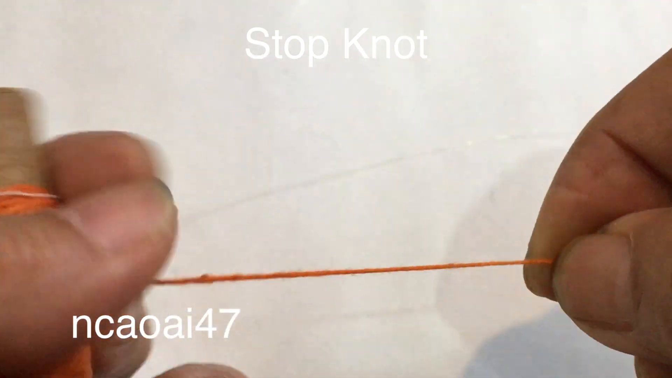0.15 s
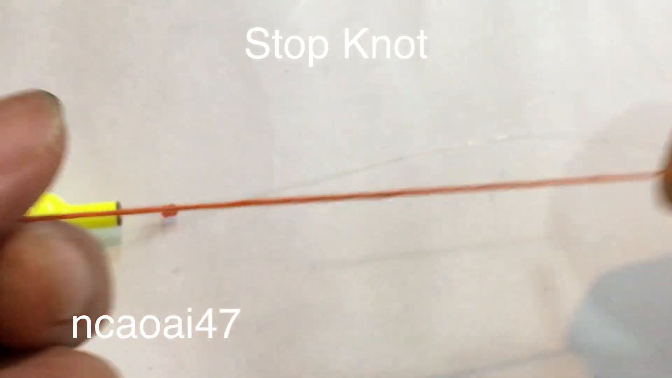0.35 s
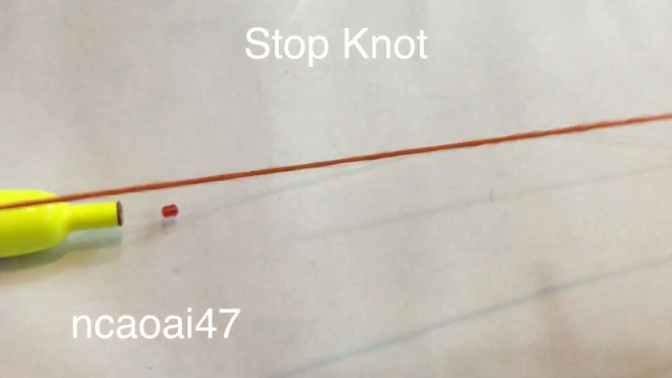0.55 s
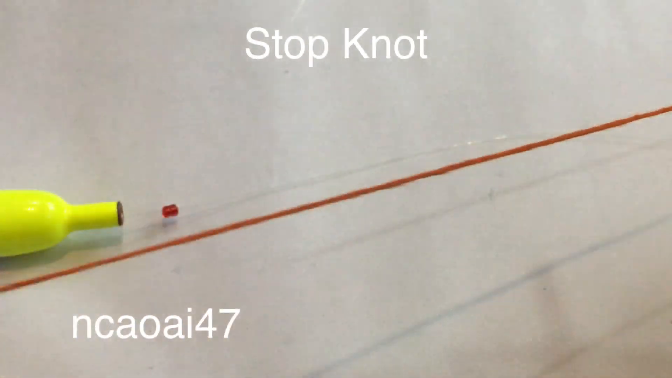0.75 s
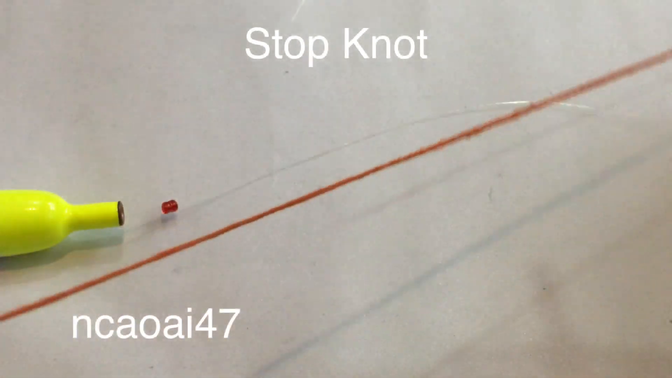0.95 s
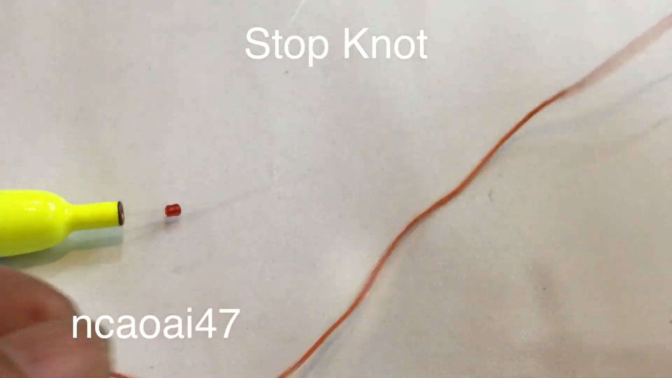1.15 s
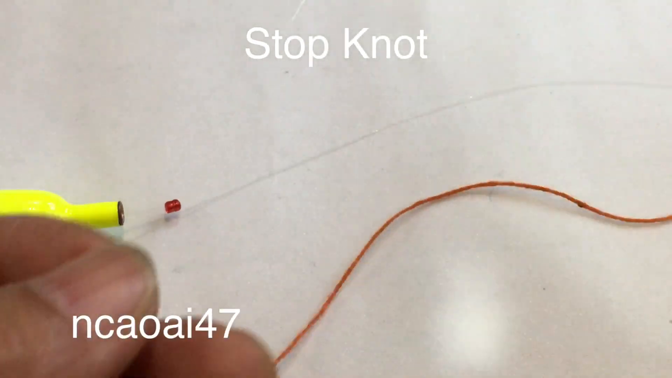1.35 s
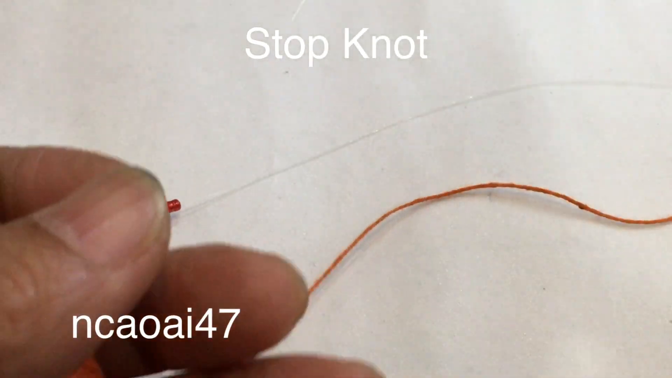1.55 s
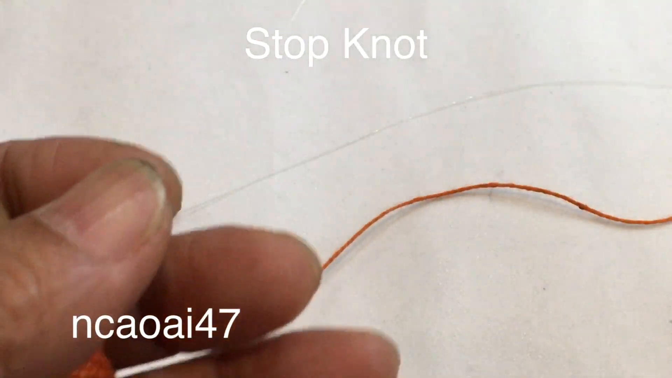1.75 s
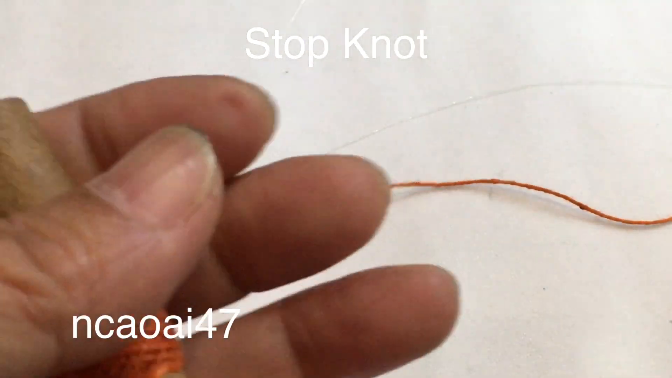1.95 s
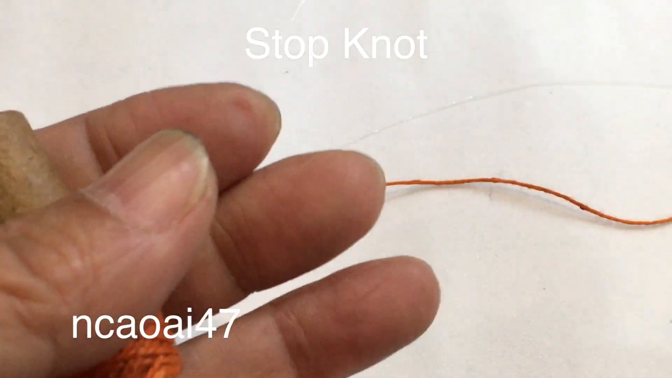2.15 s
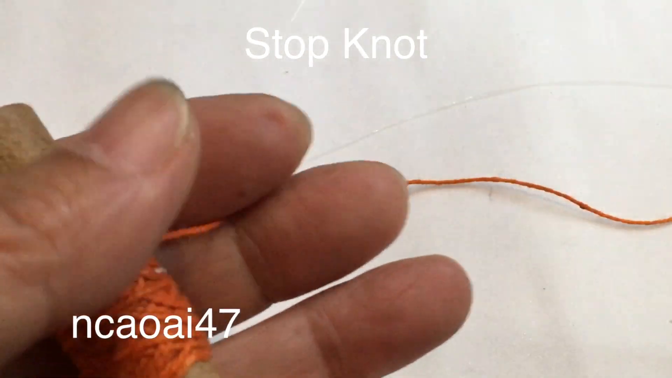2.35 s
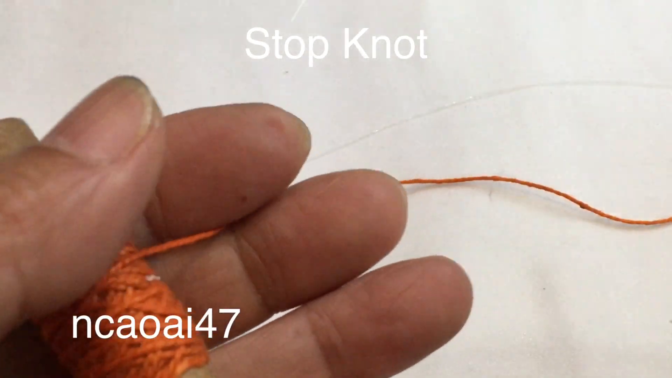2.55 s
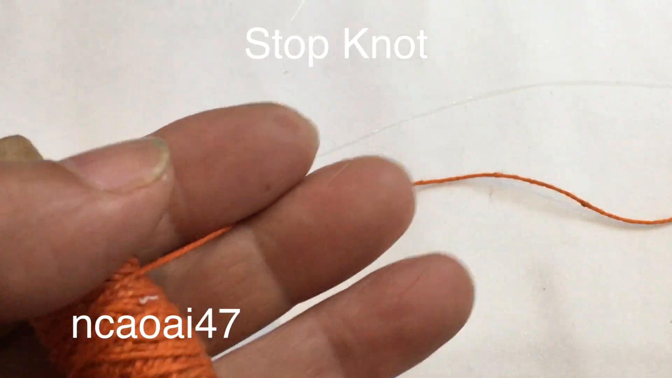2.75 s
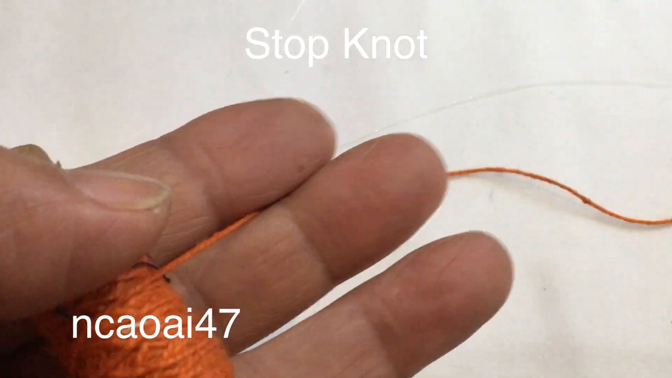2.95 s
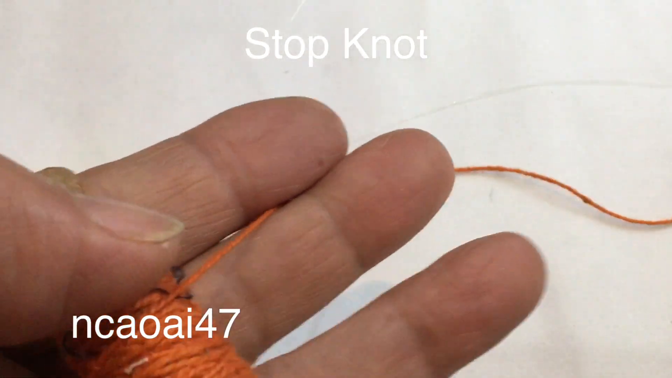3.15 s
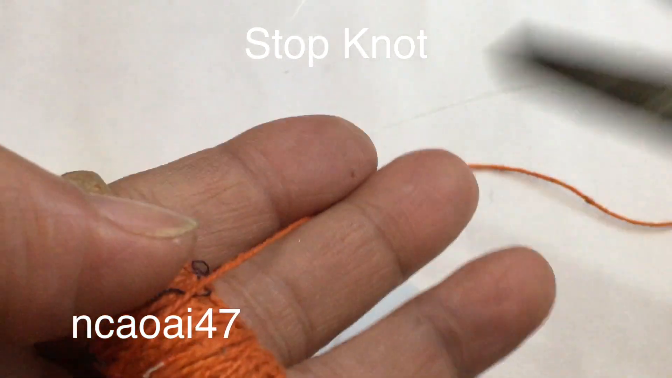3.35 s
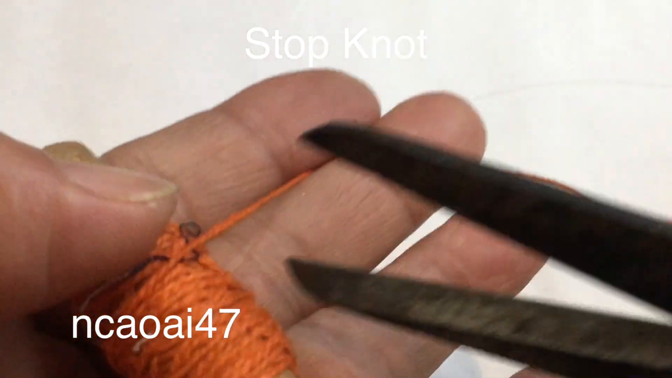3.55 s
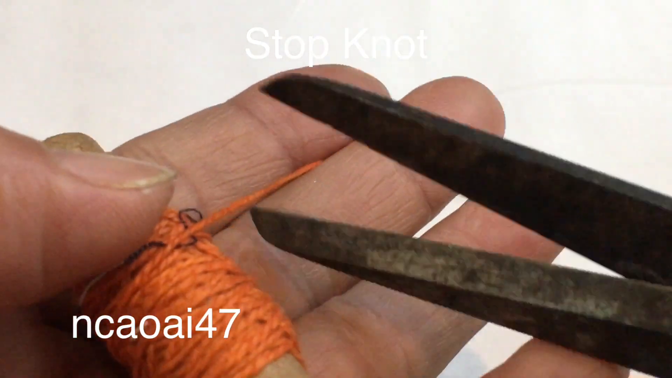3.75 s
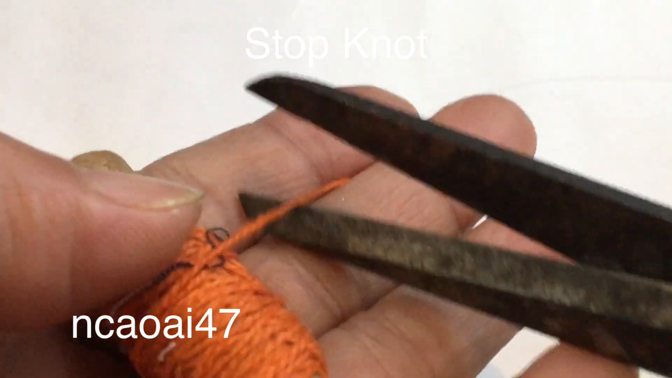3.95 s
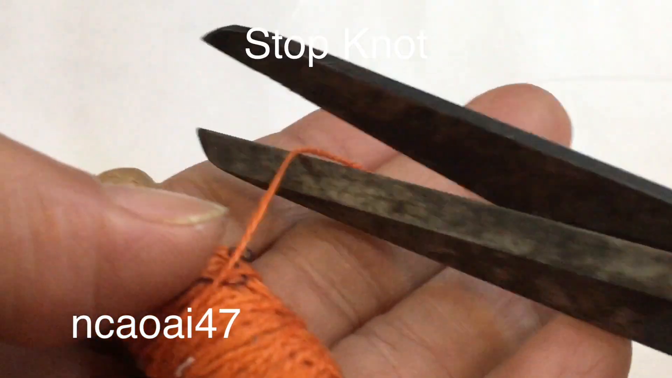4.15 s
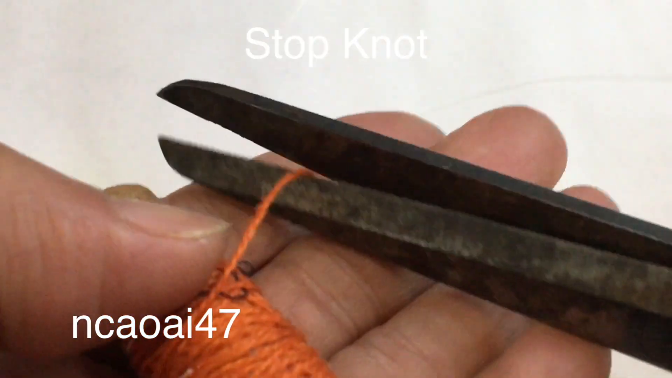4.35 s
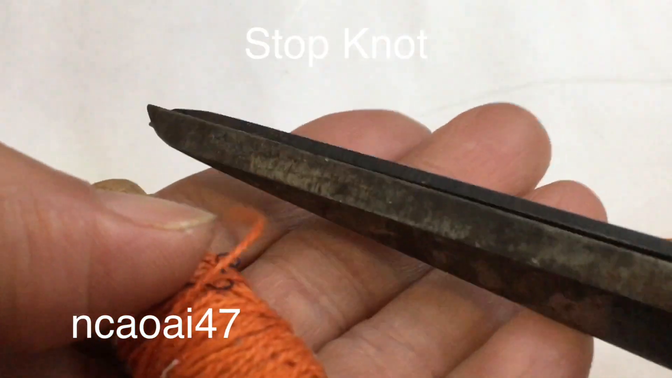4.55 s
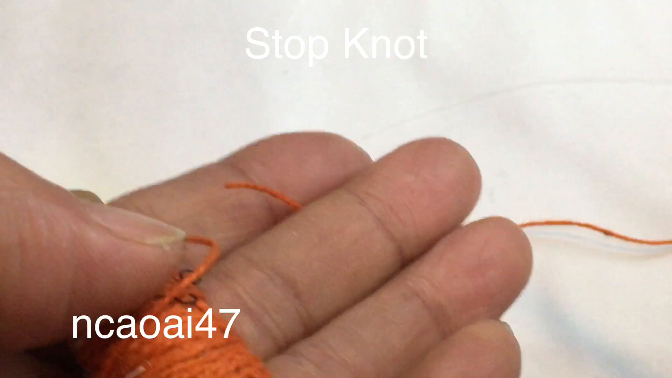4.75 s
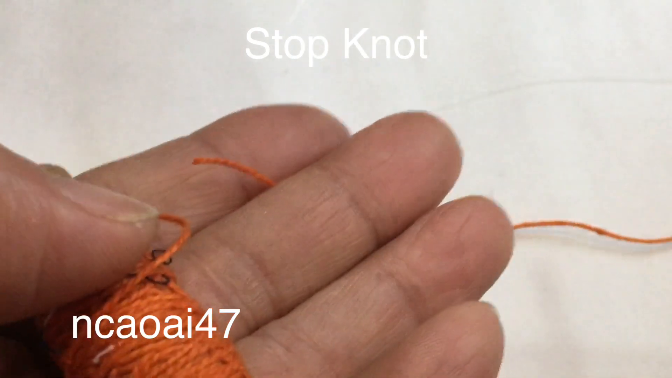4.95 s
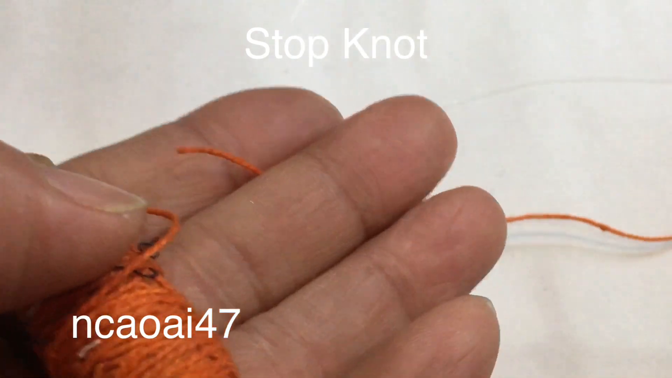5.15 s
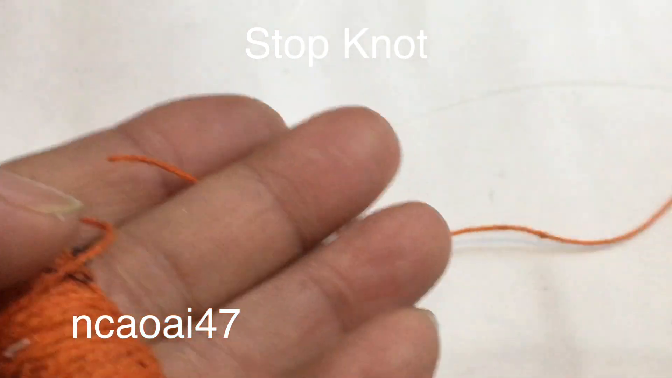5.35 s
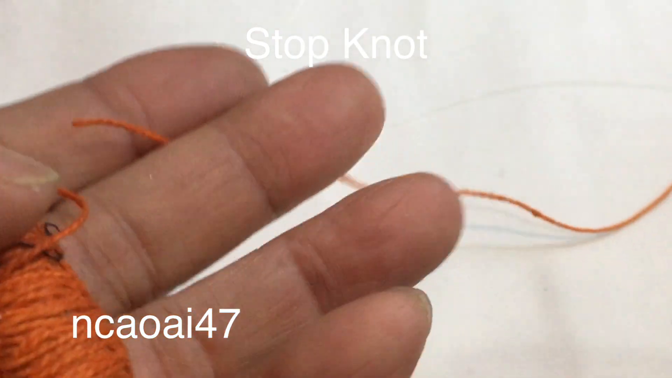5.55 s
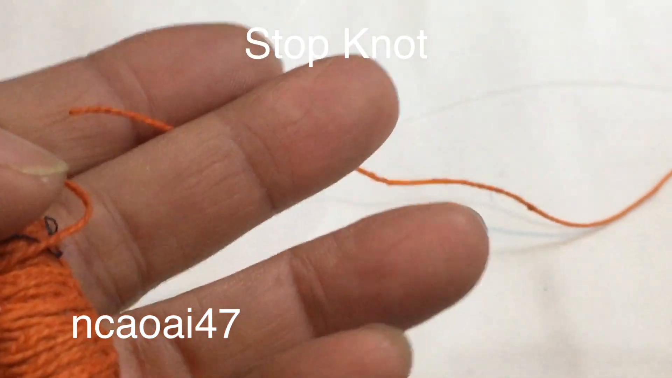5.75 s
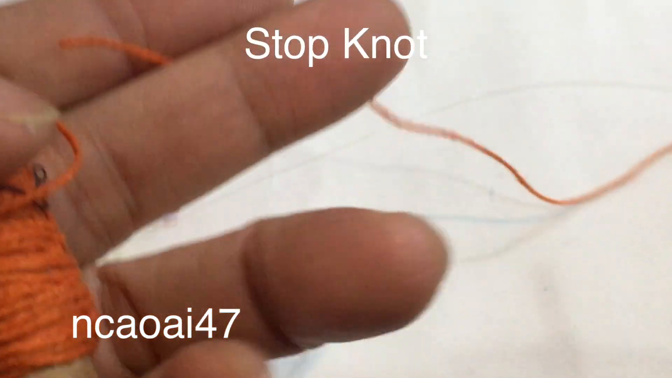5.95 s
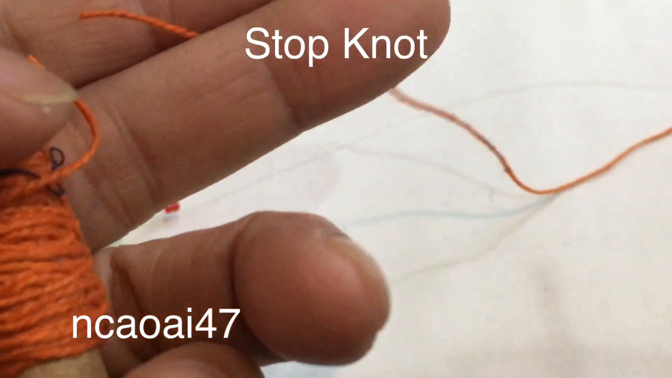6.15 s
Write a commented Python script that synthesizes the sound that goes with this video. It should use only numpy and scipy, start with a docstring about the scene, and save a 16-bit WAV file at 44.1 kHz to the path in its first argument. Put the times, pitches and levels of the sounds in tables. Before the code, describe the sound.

Close up, faint thread rustle and dull finger taps, crisp steel snip of big scissors, then four loud ringing knocks on a wooden table top.

```python
"""Thread hisses through fingers and sleeves swish, close up in a small quiet room: shaped friction noise.
Fingers tap and rub a wooden spool (filtered bursts, noise); fibres crackle (ticks); a low hum swells once.
Heavy steel scissors click open and slide shut through the thread: noise force on damped modes, friction.
Laid on the table they knock four times, chatter and ring out: modes of table top and steel.
"""
import sys
import numpy as np
from scipy import signal
from scipy.fft import rfft, irfft, next_fast_len
from scipy.io import wavfile
from scipy.ndimage import uniform_filter1d

SR = 44100
rng = np.random.default_rng(int(sys.argv[2]) if len(sys.argv) > 2 else 0)


def unload_wav(signal):
    """Save mono or channel-first audio to the path in sys.argv[1] as 16-bit WAV at rate SR, clipped to [-1, 1]."""
    wavfile.write(
        sys.argv[1],
        SR,
        np.round(np.clip(np.atleast_2d(signal).T, -1, 1) * 32767).astype(np.int16),
    )


N = 272934
TIME = np.arange(N) / SR
TAIL = TIME[:SR // 2]

# Event levels: energy spread over 10 ms. Movement levels: rms at the peak of the arch.
# Colours and mode levels are relative. Build-up and fade are exponential time constants.

# room air and rumble colour: f/Hz, level/dB
AIR_COLOUR = [(12, -42.5), (20, -38.5), (43, 2.5), (81, -7.5), (120, 1.5), (168, -9), (234, -8),
              (434, -19.5), (780, -22), (1120, -18), (3950, -37), (5680, -44), (7110, -43), (9670, -30.5),
              (16000, -42)]
# sleeves swish as the arms move: start/s, length/s, level/dB
SLEEVE_SWISHES = [(0, 0.4, -63.5), (.95, 0.51, -66.5), (1.45, 1.39, -67), (2.85, 0.4, -65.5),
                  (3.22, 0.4, -67), (3.58, 0.41, -62.5), (4.33, 0.31, -65.5), (4.54, 0.35, -58),
                  (4.76, 0.39, -65)]
# thread drawn over skin or blade: start/s, length/s, level/dB
THREAD_PULLS = [(-.06, .26, -71), (.2, 0.53, -60), (.32, 0.16, -71), (.58, 0.069, -61), (.705, 0.31, -60),
                (1.05, .3, -75), (1.51, 0.057, -73), (2.385, 0.12, -68.5), (2.82, 0.22, -74),
                (4.11, 0.07, -70.5)]
# thread friction colour: f/Hz, level/dB
THREAD_HISS_COLOUR = [(1470, -52.5), (2500, -11.5), (3550, -11.5), (3770, -7), (4800, -9.5), (5560, 3),
                      (6600, -3), (9290, -1), (10500, -5.5), (15000, -6), (16000, -21)]
# fibres catch and let go: t/s, level/dB, fade/s
FIBRE_SNAGS = [(0.6073, -50, 0.0012), (1.019, -64, 0.0017), (1.073, -70, 0.0027), (1.109, -68, 0.0027),
               (1.154, -66, 0.002), (1.254, -69.5, 0.0012), (1.319, -68, 0.0018), (1.333, -64, 0.0012),
               (1.933, -69.5, 0.00091), (2.021, -68.5, .001), (2.091, -59.5, 0.00068), (2.5225, -70, .0012)]
# taps of fingers and spool: t/s, level/dB, brightness (low-pass)/Hz, t60/s
SPOOL_TAPS = [(0.607, -68, 12000, 0.061), (2.058, -52.5, 2000, 0.037), (2.0759, -48.5, 1490, 0.031),
              (2.0906, -44, 6500, 0.0082), (2.0922, -46.5, 600, 0.039), (2.155, -50, 600, 0.016),
              (2.393, -52, 2000, 0.096), (2.4173, -42, 2100, 0.027), (2.502, -49.5, 2010, 0.049),
              (2.522, -52.5, 5850, 0.026), (3.518, -53.5, 543, 0.016), (4.481, -49.5, 5130, 0.043),
              (4.5008, -51, 4000, 0.023), (4.517, -48, 607, 0.031), (4.538, -52.5, 2000, 0.011)]
# tap colour: f/Hz, level/dB
TAP_COLOUR = [(40, 3.5), (130, -4), (280, 10), (650, -8.5), (1200, -1), (2500, -13.5), (6000, -14.5),
              (16000, -29.5)]
# fingers rub on the spool: start/s, length/s, level/dB
SPOOL_RUBS = [(2.025, 0.15, -62.5), (2.25, .125, -60.5), (2.49, 0.069, -62), (2.57, 0.044, -56.5),
              (2.92, 0.14, -67)]
# slack thread and dry fingers crackle: start/s, length/s, level/dB
FIBRE_CRINKLES = [(.96, 0.23, -69.5), (1.23, 0.16, -77), (2.06, 0.18, -70.5), (2.49, 0.11, -73.5)]
# steel modes: f/Hz, free t60/s, level blade on blade/dB, level shut scissors on table/dB
STEEL_MODES = [(1900, 0.09, -18.5, -12.5), (2420, .1, -13.5, -13.5), (3530, 0.12, -13.5, -21),
               (4506, 0.24, -9, -37), (5510, .2, -7, -19), (6135, 0.28, -15.5, -6.5),
               (7035, 0.28, -2.5, -4.5), (7720, .2, -3.5, -8.5), (8380, 0.13, -12, -7),
               (8640, 0.19, -25, 4.5), (8736, 0.18, -22, 4), (9140, .19, -6.5, -1.5),
               (9130, .14, -21.5, -8.5), (9760, 0.17, 3.5, -10), (9940, 0.26, -9, -2),
               (10020, .22, -26, -4), (10700, .15, -6, -4), (11320, .16, -5.5, -8.5),
               (11700, .14, -7.5, -8.5), (12450, 0.5, -16, -6), (13060, 0.13, -1.5, -18),
               (13100, .1, -21, -28), (14560, .26, -21.5, -7.5), (14560, .14, -5.5, -4)]
# blade against blade, in the hand: t/s, level/dB, build-up/s, fade/s, tilt/(dB/octave),
# most excited f/Hz, its lift/dB
BLADE_CLICKS = [(3.135, -32, 0.0015, 0.0019, 4, 9900, 2), (3.141, -45.5, 0.0013, 0.0064, 1.5, 5450, 17),
                (3.176, -59, 0.016, 0.019, -7.5, 7540, 8), (3.211, -57, .008, 0.015, -7.5, 11400, 23),
                (3.2291, -54, 0.000041, 0.001, 0.5, 11250, 5), (4.37, -51.5, 0.00055, 0.002, 3.5, 11130, 8),
                (4.532, -34, .0037, 0.0037, -1, 11500, 4.5), (4.559, -46, 0.0025, 0.0058, -2, 12500, 7.5),
                (4.571, -27, 0.00012, 0.00069, -1, 13500, 6), (4.764, -40, 0.0033, 0.0045, 1.5, 10330, 3),
                (4.838, -58, 0.0015, 0.0045, 4, 10000, 10), (4.8488, -37.5, 0.00026, 0.0035, 0, 6100, 15)]
# edges slide along each other: start/s, length/s, level at start/dB, level at end/dB
EDGE_STROKES = [(4.307, 0.22, -64.5, -65.5), (4.549, .425, -61.5, -64.5)]
# edge friction colour: f/Hz, level/dB
EDGE_COLOUR = [(500, -10), (1200, 5.5), (2300, -0.5), (4000, -2.5), (5200, -6.5), (7000, -6), (10000, -9),
               (16000, -14)]
# scissors are laid on the table top: t/s, level/dB, contact hardness (low-pass)/Hz
TABLE_KNOCKS = [(5.3761, -36.5, 5000), (5.38, -45.5, 4000), (5.4733, -29.5, 5100), (5.483, -39.5, 2980),
                (5.641, -25, 4860), (5.656, -39, 2520), (5.835, -49.5, 790), (5.861, -30, 1910),
                (5.8787, -22.5, 5800), (5.894, -27.5, 3450), (5.901, -31, 3470), (5.921, -34.5, 1970),
                (5.929, -31.5, 2000)]
# table top modes: f/Hz, t60/s, level/dB
TABLE_MODES = [(221, 0.12, -5.5), (290, 0.065, -1.5), (359.6, 0.067, -0.5), (541, 0.055, -2),
               (783, 0.062, -4), (923, 0.033, -1.5), (1300, 0.029, 5.5), (1398, 0.045, -6.5),
               (1706, 0.054, -19), (2114, 0.028, 1), (2534, 0.034, -1.5), (3110, 0.043, -5),
               (3630, 0.0088, -0.5)]
# table top dense-mode colour: f/Hz, level/dB
WOOD_COLOUR = [(80, -46), (250, -0.5), (600, -6.5), (1300, 3), (3000, 1), (6000, -4.5), (16000, -4)]
# loose blades rattle on the table: t/s, level/dB, build-up/s, fade/s, ring/dB, tilt/(dB/octave)
BLADE_CHATTER = [(5.38, -33.5, .0015, .004, -16, 16), (5.3907, -33.5, .0004, 0.0042, -5, 2),
                 (5.485, -38.5, .0087, 0.013, -22, -6), (5.6441, -26, .0014, 0.0028, -34, 6.5),
                 (5.655, -36, .0016, 0.0025, -24, 6), (5.864, -23.5, .0005, 0.011, -15, 2.5),
                 (5.881, -20.5, .0005, 0.012, -3, 0), (5.892, -25, .0015, 0.0044, 3, 10),
                 (5.9, -21, .0009, 0.0061, 4, -0.5), (5.931, -31.5, .0008, 0.0042, -14, 1)]
# room tail colour: f/Hz, level/dB
WALL_COLOUR = [(100, -7), (300, -8), (1000, -4.5), (2300, -5.5), (3600, -5.5), (5000, -1.5), (10000, -8),
               (16000, -6.5)]

# background rms; arm rumble is relative to its swish
RUMBLE_DB, AIR_DB, HISS_DB, ARM_RUMBLE_DB = -59, -69, -78.5, 3
HUM_HZ, HUM_DB, HUM_START_S, HUM_ATTACK_S, HUM_FADE_S = 162.4, -59, 1.15, 0.14, 1.0
# blades ring longer in a loose hand than in the firm grip taken for the cut
LOOSE_T60_S, FIRM_T60_S, GRIP_AT_S = 0.016, 0.007, 4.45
# squeezed thread grinds louder until it parts
BITE_AT_S, BITE_DB, BITE_BUILD_S = 4.486, -48, 0.02
RING_SHARE = 0.48  # share of the free t60 that the hand allows
NEAR_ROOM_DB = -14  # room drive of hand sounds, relative to table sounds
TOP_HZ = 15800


def undb(db):
    """Decibels to gain."""
    return 10 ** (np.asarray(db) / 20)


def unit(x):
    """Scale to unit energy."""
    return x / np.sqrt(np.sum(x ** 2) + 1e-18)


def add(out, at_s, x, level_db):
    """Mix in an event; a unit-energy x has its level as energy spread over 10 ms."""
    start = int(at_s * SR)
    part = x[:N - start]
    out[start:start + len(part)] += part * undb(level_db) * np.sqrt(SR / 100)


def colour(x, points):
    """Minimum-phase filter through (f/Hz, level/dB) points, by folded cepstrum."""
    hz, db = np.transpose(points)
    size = next_fast_len(2 * len(x))
    grid_hz = np.maximum(np.arange(size // 2 + 1) * SR / size, 1)
    curve_db = np.interp(np.log(grid_hz), np.log(hz), db)
    cepstrum = irfft(np.log(undb(curve_db)), size)
    cepstrum[1:size // 2] *= 2
    cepstrum[size // 2 + 1:] = 0
    return irfft(rfft(x, size) * np.exp(rfft(cepstrum)), size)[:len(x)]


def soften(x, hz):
    """Low-pass: a softer contact pushes for longer and loses the treble."""
    return signal.sosfilt(signal.butter(2, min(hz, SR / 2 - 1), fs=SR, output="sos"), x)


def high_pass(x, hz):
    """Second-order Butterworth high-pass."""
    return signal.sosfilt(signal.butter(2, hz, "high", fs=SR, output="sos"), x)


def fade(t60_s):
    """Exponential decay, 60 dB in t60."""
    return np.exp(-np.log(1000) * TAIL / t60_s)


def burst(t60_s):
    """Decaying noise: many modes too close to tell apart."""
    return rng.standard_normal(len(TAIL)) * fade(t60_s)


def ring(hz, t60_s, db):
    """Sum of decaying sines, energy by level, signs alternating; unit energy."""
    total = np.zeros(len(TAIL))
    for k, (f, t60, level_db) in enumerate(zip(hz, t60_s, db)):
        mode = unit(np.sin(2 * np.pi * f * TAIL) * fade(t60))
        total += (-1) ** k * undb(level_db) * mode
    return unit(total)


def walk(rate_hz):
    """Random curve: normal knots at the rate, joined by lines."""
    knots = rng.standard_normal(int(N / SR * rate_hz) + 2)
    return np.interp(TIME * rate_hz, np.arange(len(knots)), knots)


def gestures(rows, power):
    """Each hand movement's speed is an arch; loudness is a power of the speed."""
    gain = np.zeros(N)
    for start_s, length_s, level_db in rows:
        moving = (TIME > start_s) & (TIME < start_s + length_s)
        speed = np.abs(np.sin(np.pi * (TIME[moving] - start_s) / length_s))
        gain[moving] += undb(level_db) * speed ** power
    return gain


def friction(gain, points, grain_db):
    """Countless tiny slips of uneven size, as loud as the movement makes them."""
    grain = uniform_filter1d(rng.standard_normal(N), size=36) * 6  # spread of one
    slips = rng.standard_normal(N) * undb(grain_db * grain)
    return unit(colour(slips, points)) * np.sqrt(N) * gain


def scrape(build_s, fade_s):
    """Tiny impacts that build up and die away; returns the force and its peak time."""
    peak_s = 4 * build_s
    t = TAIL[:SR // 12] - peak_s
    envelope = np.exp(np.minimum(t / build_s, -t / fade_s))
    return rng.standard_normal(len(t)) * envelope, peak_s


def background(split_hz=330, waver_db=2.23, hum_drift_hz=0.85):
    """Wavering rumble and hum, room air with sleeve swish, even microphone hiss."""
    low = soften(colour(rng.standard_normal(N), AIR_COLOUR), split_hz)
    air = high_pass(colour(rng.standard_normal(N), AIR_COLOUR), split_hz)
    arms = gestures(SLEEVE_SWISHES, power=0.81)
    low_gain = np.hypot(undb(RUMBLE_DB), undb(ARM_RUMBLE_DB) * arms)
    low = unit(low) * low_gain * undb(waver_db * walk(7.9))
    air = unit(soften(air, 4100)) * np.hypot(undb(AIR_DB), arms)
    hiss = unit(colour(rng.standard_normal(N), [(2000, -1.5), (6000, 6), (16000, 0.0)])) * undb(HISS_DB)
    hum_phase = 2 * np.pi * np.cumsum(HUM_HZ + hum_drift_hz * walk(29)) / SR
    age_s = TIME - HUM_START_S
    swell = np.minimum(age_s / HUM_ATTACK_S, np.exp((HUM_ATTACK_S - age_s) / HUM_FADE_S))
    hum = unit(np.sin(hum_phase)) * np.clip(swell, 0, 1) * undb(HUM_DB + waver_db * walk(2.8))
    return np.sqrt(N) * (low + air + hiss + hum)


def thread():
    """Thread hisses through the fingers by friction; snags are short noise forces."""
    out = friction(gestures(THREAD_PULLS, power=0.44), THREAD_HISS_COLOUR, grain_db=1.5)
    snag_colour = [(1000, -22), (3500, 30.5), (9000, 21.0), (16000, 19.0)]
    for at_s, level_db, fade_s in FIBRE_SNAGS:
        force, peak_s = scrape(0.000269, fade_s)
        add(out, at_s - peak_s, unit(colour(force, snag_colour)), level_db)
    return out


def handling():
    """Fingers on the spool: dull friction, and taps as low-passed decaying noise."""
    rub_colour = [(100, -21.0), (280, 4.5), (600, -6.0), (1300, -5.0), (2800, -17.5),
                  (5000, -26.0), (16000, -42.0)]
    out = friction(gestures(SPOOL_RUBS, power=0.46), rub_colour, grain_db=5.5)
    for at_s, level_db, bright_hz, t60_s in SPOOL_TAPS:
        tap = soften(colour(burst(t60_s), TAP_COLOUR), bright_hz)
        add(out, at_s, unit(tap), level_db)
    return out


def crackle(count=12000, centre_hz=3700, spread_octaves=0.3, fade_cycles=4, spread_db=5):
    """Single fibres slip with tiny decaying-sine ticks, each of its own pitch and size."""
    out = np.zeros(N + SR)
    t = TAIL[:SR // 200]
    start = rng.integers(0, N, (count, 1))
    pitch = np.clip(rng.standard_normal((count, 1)), -2, 2)
    size = np.clip(rng.standard_normal((count, 1)), -2, 2)
    turns = centre_hz * 2 ** (spread_octaves * pitch) * t
    ticks = undb(spread_db * size) * np.sin(2 * np.pi * turns) * np.exp(-turns / fade_cycles)
    np.add.at(out, start + np.arange(len(t)), ticks)
    return unit(out[:N]) * np.sqrt(N) * gestures(FIBRE_CRINKLES, power=0.96)


def snips(focus_width_hz=380, crack_db=-6, crack_t60_s=0.0096, grip_slope=0.13):
    """Blades click together; the hand damps the modes almost at once, high ones first."""
    out = np.zeros(N)
    hz, _, db, _ = np.transpose(STEEL_MODES)
    crack_colour = [(500, -26.0), (2000, -19.5), (6000, 24), (12000, -6.5), (16000, 20)]
    for at_s, level_db, build_s, fade_s, tilt_db, focus_hz, focus_db in BLADE_CLICKS:
        held_t60_s = LOOSE_T60_S if at_s < GRIP_AT_S else FIRM_T60_S
        t60_s = held_t60_s * (np.median(hz) / hz) ** grip_slope
        force, peak_s = scrape(build_s, fade_s)
        # where the edges cross decides which modes speak
        spot_db = focus_db * np.exp(-((hz - focus_hz) / focus_width_hz) ** 2)
        modes = ring(hz, t60_s, db + tilt_db * np.log2(hz) + spot_db)
        crack = unit(colour(burst(crack_t60_s), crack_colour))
        response = modes + undb(crack_db - focus_db / 2) * crack  # more focus, less crack
        add(out, at_s - peak_s, unit(signal.fftconvolve(force, response)), level_db)
    return out


def edges(ramp_s=0.021, grain_db=1.5):
    """Edges hiss by friction on each stroke; the bite builds up, stops dead as the thread parts."""
    gain = undb(BITE_DB) * np.exp(-np.abs(TIME - BITE_AT_S) / BITE_BUILD_S) * (TIME < BITE_AT_S)
    for start_s, length_s, first_db, last_db in EDGE_STROKES:
        end_s = start_s + length_s
        touching = np.clip(np.minimum(TIME - start_s, end_s - TIME) / ramp_s, 0, 1)
        gain = gain + touching * undb(np.interp(TIME, [start_s, end_s], [first_db, last_db]))
    return friction(gain, EDGE_COLOUR, grain_db)


def knocks(dense_db=0, dense_t60_s=0.05, crack_db=-2, crack_t60_s=0.0092, scatter_db=2, shift=0.027):
    """Scissors' weight excites table top modes, each time at another spot."""
    out = np.zeros(N)
    hz, t60_s, db = np.transpose(TABLE_MODES)
    crack_colour = [(300, -19), (1300, -3.5), (4000, -2.5), (16000, -16)]
    for at_s, level_db, hard_hz in TABLE_KNOCKS:
        loaded_hz = hz * (1 + shift * rng.standard_normal(len(hz)))  # the load moves the modes
        modes = ring(loaded_hz, t60_s, db + scatter_db * rng.standard_normal(len(hz)))
        dense = unit(colour(burst(dense_t60_s), WOOD_COLOUR))
        crack = unit(colour(burst(crack_t60_s), crack_colour))
        response = modes + undb(dense_db) * dense + undb(crack_db) * crack
        add(out, at_s, unit(soften(response, hard_hz)), level_db)
    return out


def chatter(contact_t60_s=0.01, crack_db=-6, crack_t60_s=0.0062, shift=0.0018, dense_db=-11,
            dense_t60_s=0.21):
    """Shut scissors rattle on the table: contact damps one set of modes, a freer set rings on."""
    out = np.zeros(N)
    hz, free_t60_s, _, db = np.transpose(STEEL_MODES)
    crack_colour = [(500, -8), (3000, -19), (8000, 9), (16000, 22)]
    dense_colour = [(1000, -36), (5000, -10), (9000, -14), (12000, -1), (16000, -6)]
    for at_s, level_db, build_s, fade_s, ring_db, tilt_db in BLADE_CHATTER:
        force, peak_s = scrape(build_s, fade_s)
        # every new support detunes the blades a little
        tuned_hz = hz * (1 + shift * rng.standard_normal(len(hz)))
        struck_db = db + tilt_db * np.log2(hz)
        damped = ring(tuned_hz, np.full(len(hz), contact_t60_s), struck_db)
        free = ring(tuned_hz, RING_SHARE * free_t60_s, struck_db)
        crack = unit(colour(burst(crack_t60_s), crack_colour))
        dense = unit(colour(burst(dense_t60_s), dense_colour))  # the many weak modes
        response = damped + undb(ring_db) * free + undb(crack_db) * crack + undb(dense_db) * dense
        add(out, at_s - peak_s, unit(signal.fftconvolve(force, response)), level_db)
    return out


def room(x, wet_db=-16, low_t60_s=0.59, high_t60_s=0.45, split_hz=3500, build_s=0.0078,
         echo_db=-20, echo_s=0.028, echo_t60_s=0.11):
    """Near surfaces return a tail whose treble dies first; a wall adds a smeared mid-range echo."""
    noise = soften(burst(low_t60_s), split_hz) + high_pass(burst(high_t60_s), split_hz)
    build_up = 1 - np.exp(-(TAIL / build_s) ** 2)
    tail = unit(colour(noise * build_up, WALL_COLOUR))
    echo_colour = [(200, -8), (1000, -11.5), (2300, -1.0), (3300, -9.5), (4500, -14), (16000, -13.5)]
    echo = unit(colour(burst(echo_t60_s), echo_colour))
    echo = np.interp(TAIL - echo_s, TAIL, echo, left=0)  # delay
    return signal.fftconvolve(x, undb(wet_db) * tail + undb(echo_db) * echo)[:N]


def scene():
    """Hands work right at the microphone; the table is further off and stirs the room more."""
    still = background()
    near = thread() + handling() + crackle() + snips() + edges()
    far = knocks() + chatter()
    reverb = room(far + undb(NEAR_ROOM_DB) * near)
    return (still + near + far + reverb)[None]


def record(dry):
    """The recorder cuts the top: steep elliptic low-pass."""
    return signal.sosfilt(signal.ellip(10, .2, 80, TOP_HZ, fs=SR, output="sos"), dry)


dry = scene()
out = record(dry)
unload_wav(out)
```